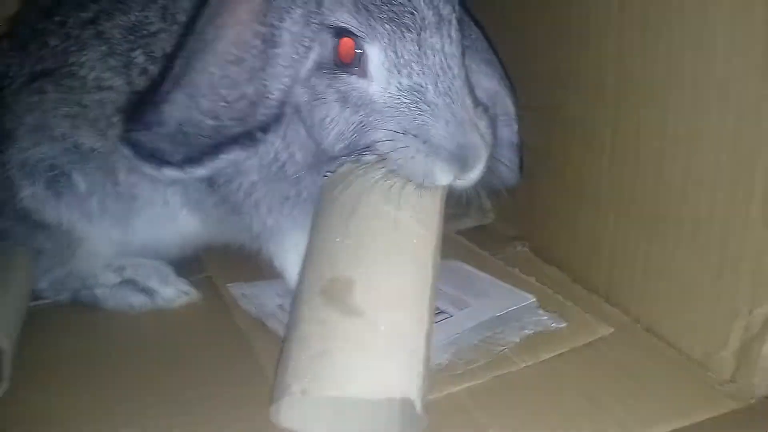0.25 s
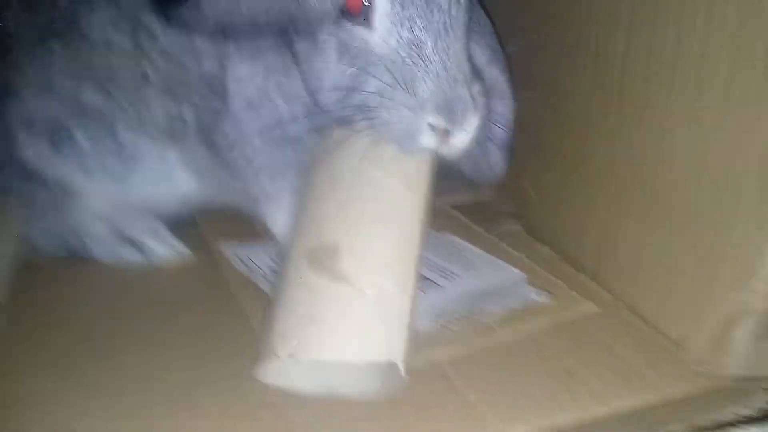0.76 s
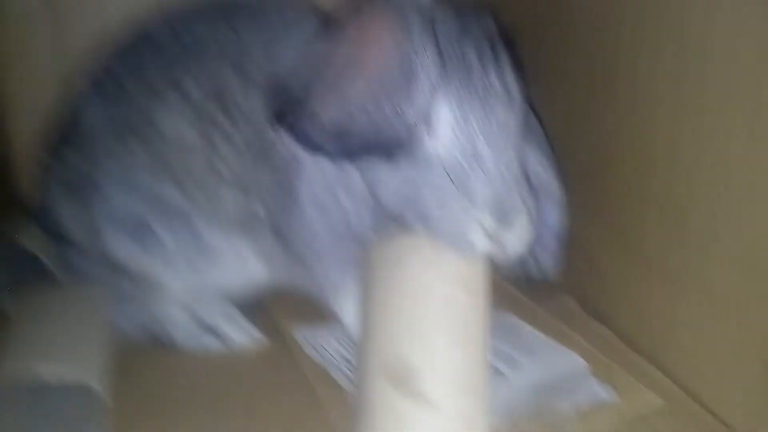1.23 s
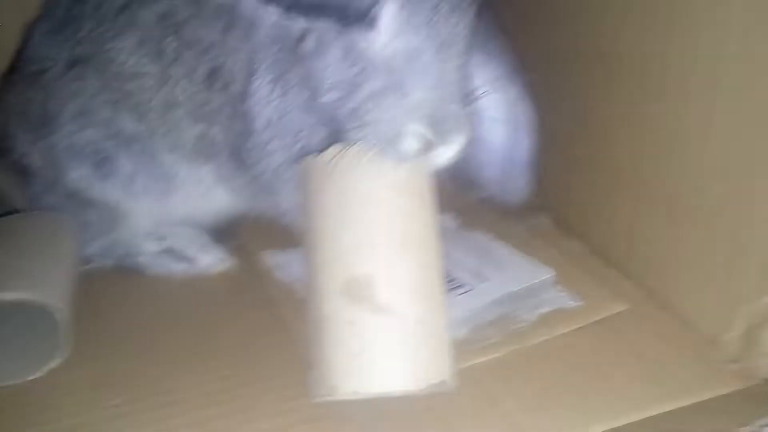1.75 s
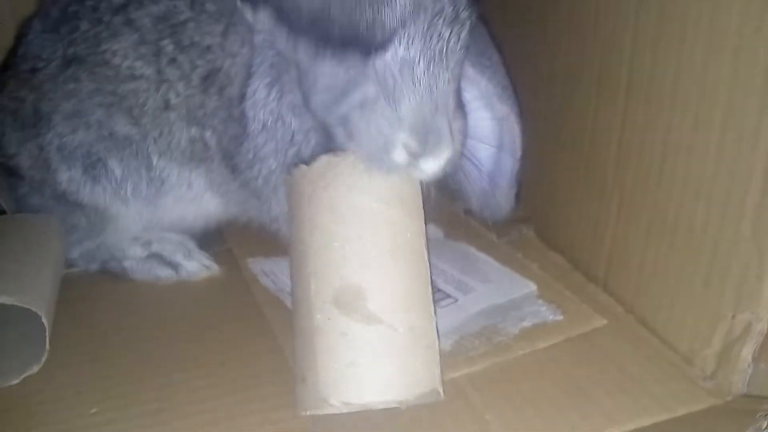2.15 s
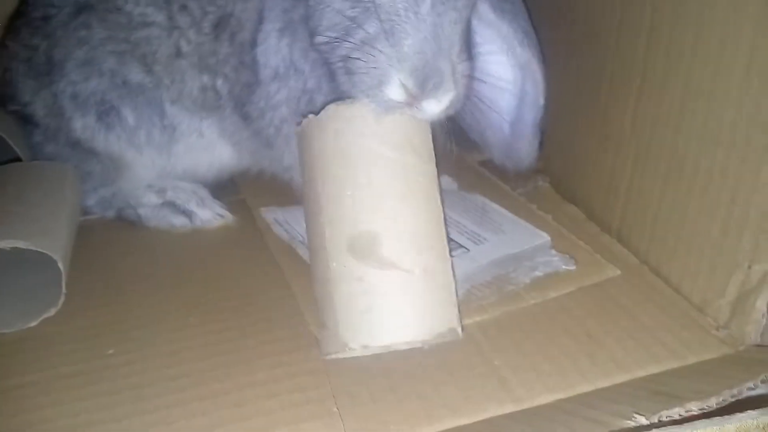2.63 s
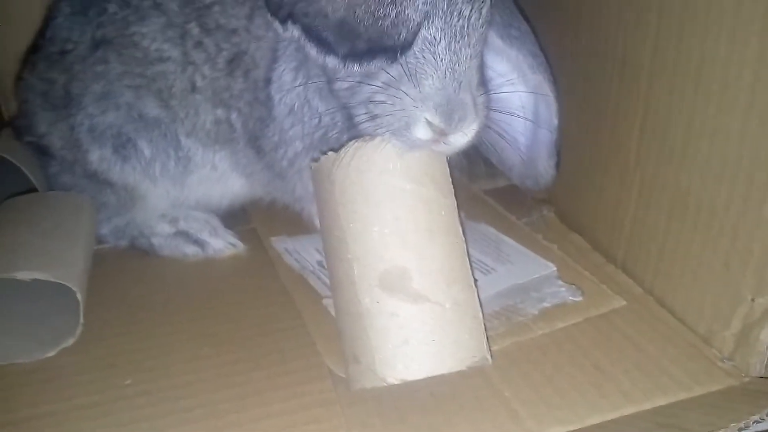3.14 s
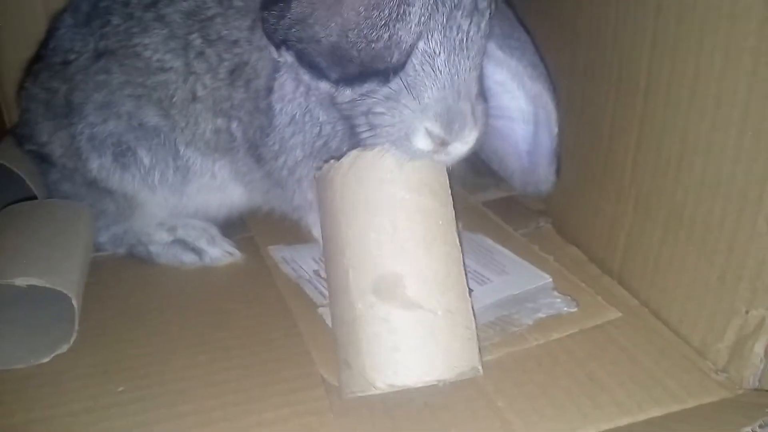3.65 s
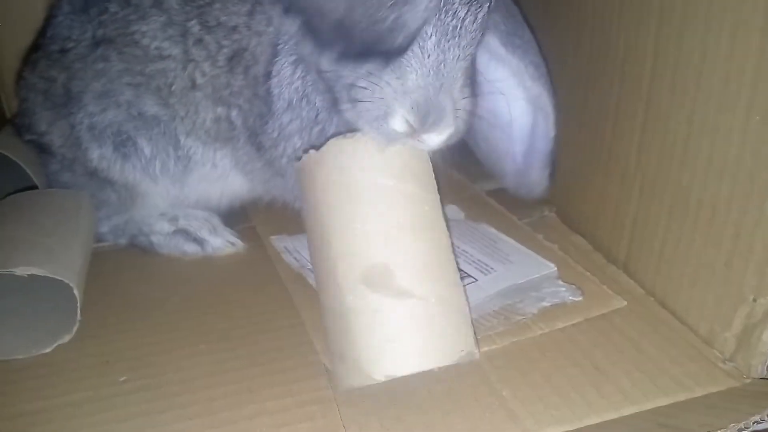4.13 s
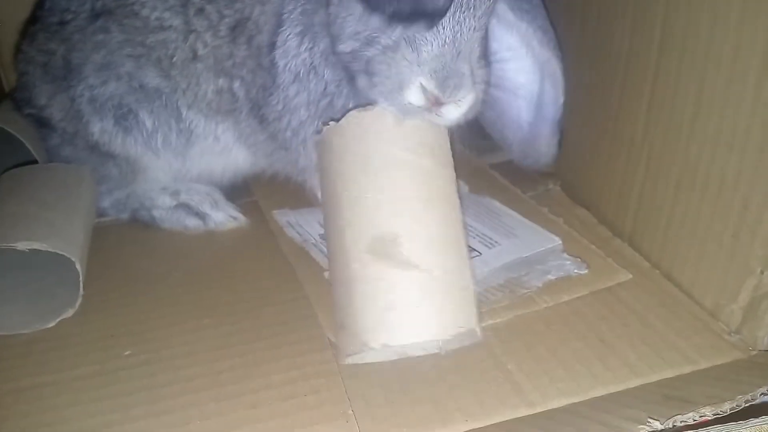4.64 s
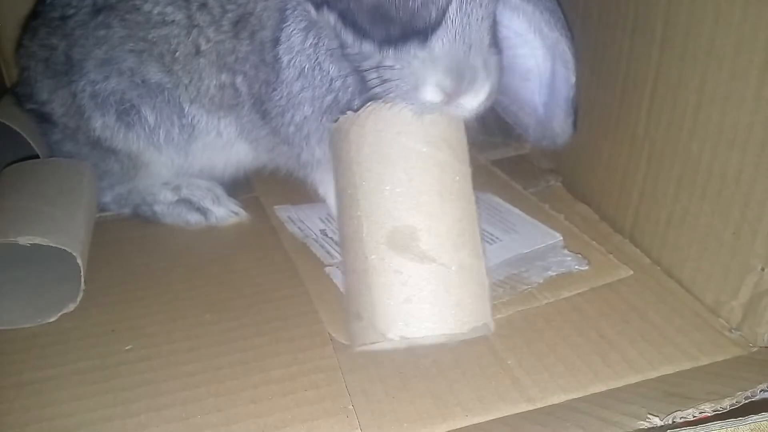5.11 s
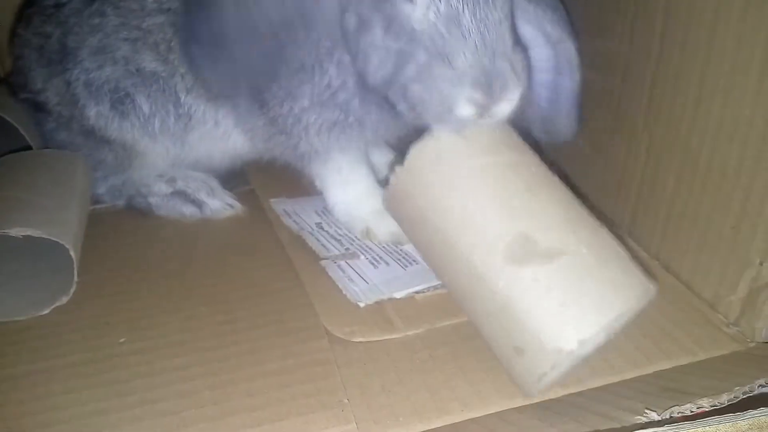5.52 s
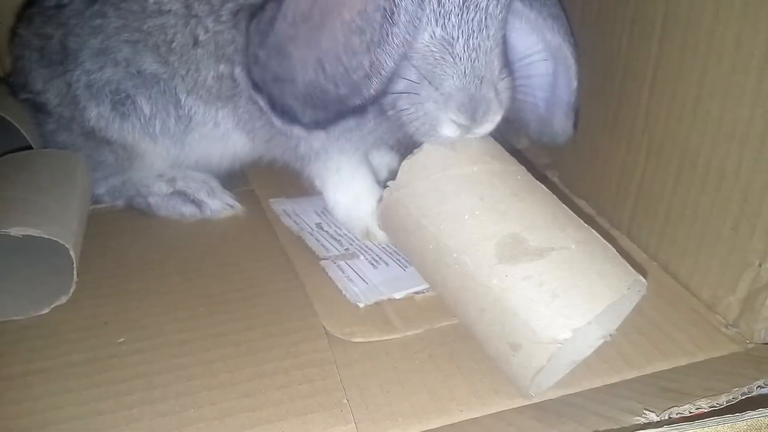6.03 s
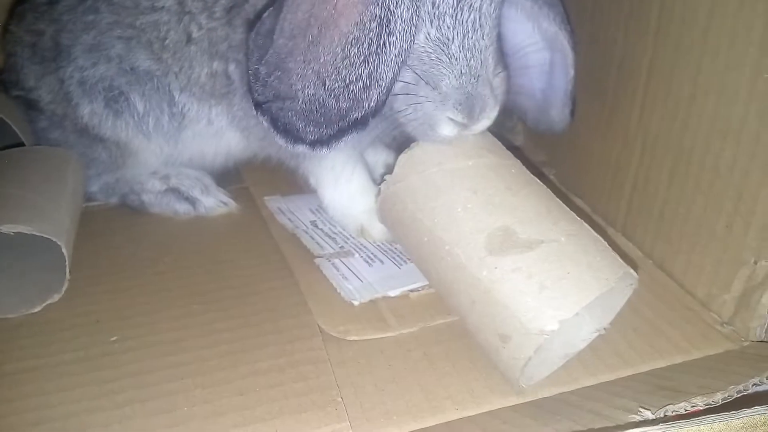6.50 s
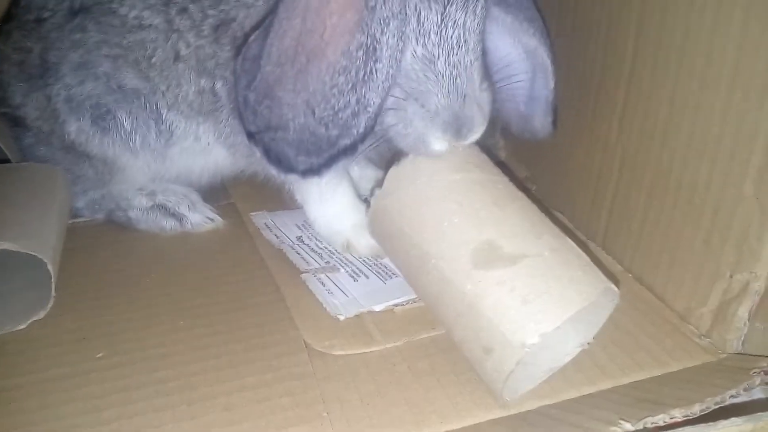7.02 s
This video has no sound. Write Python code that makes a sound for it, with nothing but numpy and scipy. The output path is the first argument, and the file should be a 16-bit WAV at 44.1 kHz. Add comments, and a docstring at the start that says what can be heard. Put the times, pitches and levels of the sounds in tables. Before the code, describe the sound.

A rabbit gnaws a cardboard tube very close to a small microphone, in a box indoors, over a quiet steady hiss and a barely audible low hum that stops near 2.9 s. From the start, crisp hollow bites come several per second, uneven in strength, with hissing paper tears between them until about 1.6 s. A strong crunch lands at 1.3 s; the heaviest cluster runs from 1.8 to 2.5 s, with dry crackles, pops, a soft thud and scraping. Biting then nearly stops. At 3.3-3.6 s rough scrapes lead to a sharp click and small bumps. Faint nibbles with tiny ringing ticks follow from 3.9 to 4.8 s, while a dull traffic-like rush swells, peaking near 5 s, then fading. A short scrape at 5.6 s and a stronger double scrape around 6.1-6.2 s give way to light papery rustling until the end at about 7.3 s.

```python
"""A rabbit gnaws a cardboard tube inside a cardboard box, close to a small microphone.
Each bite is a burst of breaking fibres (noise) that rings the tube; tearing paper hisses between early bites.
Clicks and soft bumps join in, and scrapes and rustles, bands of grainy noise, grow stronger later on.
Behind it lie a steady hiss, a faint hum that stops, and a dull rush, like traffic, that swells and fades."""
import sys
import numpy as np
from scipy import signal
from scipy.fft import rfft, irfft, next_fast_len
from scipy.io import wavfile
from scipy.ndimage import map_coordinates

SR = 44100
rng = np.random.default_rng(int(sys.argv[2]) if len(sys.argv) > 2 else 0)


def int16_out(signal):
    """Quantize to a 16-bit WAV file."""
    q = np.round(np.clip(np.atleast_2d(signal).T, -1, 1) * 32767)
    wavfile.write(sys.argv[1], SR, q.astype(np.int16))


N = 320562
TOP_HZ = 15950  # nothing in the final sound lies above this


def amp(db):
    """Turn decibels into a gain."""
    return 10 ** (np.asarray(db) / 20)


def unit(x):
    """Scale a sound to an average (rms) level of 1."""
    return x / np.sqrt(np.mean(x ** 2) + 1e-20)


def along(points, hz):
    """Read a curve of (Hz, value) points, with frequency on a log axis."""
    f, values = np.transpose(points)
    return np.interp(np.log(hz + 1), np.log(f + 1), values)


def curves(rows):
    """Draw straight lines between timed rows: one curve for each column after the time."""
    s, *columns = np.transpose(rows)
    return [np.interp(np.arange(N) / SR, s, column) for column in columns]


def filtered(x, response):
    """Multiply each frequency of a sound by a response, given as a function of Hz."""
    size = next_fast_len(len(x) + 4096)
    spectrum = rfft(x, size) * response(np.fft.rfftfreq(size, 1 / SR))
    return irfft(spectrum, size)[:len(x)]


def ring(x, modes):
    """Send a sound through damped resonances, given as (Hz, width in Hz, dB)."""
    def response(f):
        total = 0
        for k, (centre, width, db) in enumerate(modes):
            damping = 1j * f * width
            # neighbours have opposite signs
            total = total + (-1) ** k * amp(db) * damping / (centre * centre - f * f + damping)
        return total
    return filtered(x, response)


def grains(size, spread_db):
    """Tiny fibre slips of very unequal size; no spread gives smooth noise."""
    sizes_db = spread_db * np.clip(rng.standard_normal(size), -3, 3)
    return rng.standard_normal(size) * amp(sizes_db)


def noise(colour, spread_db=0):
    """Noise of rms 1, coloured by a curve of (Hz, dB) points."""
    return unit(filtered(grains(N, spread_db), lambda f: amp(along(colour, f))))


def patchy(x, width_hz, length, depth_db):
    """Random patches of pitch and time grow louder or softer; width in Hz, length in s, result at rms 1."""
    frame = 1024
    z = signal.stft(x, nperseg=frame)[2]
    patch_steps = np.array([SR / frame / width_hz, frame / 2 / SR / length])
    rows, cols = np.indices(z.shape) * patch_steps[:, None, None]
    knots = rng.standard_normal(z.shape)
    field = map_coordinates(knots, [rows, cols], order=1, mode="wrap")
    return unit(signal.istft(z * amp(depth_db * field), nperseg=frame)[1][:len(x)])


def add(track, s, sound):
    """Mix a sound into the track from time s."""
    i = round(s * SR)
    part = sound[max(-i, 0):max(N - i, 0)]
    track[max(i, 0):max(i, 0) + len(part)] += part


def bites():
    """Sharp bites that break through, and soft chews that mostly crush the card."""
    # Each row: time in seconds, level of the upper wall in dB, hollowness (lower wall over upper) in dB,
    # brightness (fibres over upper wall) in dB.
    bite_rows = [(0.09, -37, 2.5, 1), (0.2115, -45.5, -6, 6), (0.3281, -35, -1.5, 2.5),
                 (0.4341, -31.5, -6, -2.5), (0.5403, -39.5, -7, 6.5), (0.8696, -34, 6.5, 6.5),
                 (1.016, -34, -10, 5.5), (1.1531, -34, 0, 3.5), (1.3347, -25, -0.5, 7.5),
                 (1.6259, -38.5, -14, 2.5), (1.824, -41.5, 3, -1), (1.973, -28.5, 2.5, 3.5),
                 (2.0848, -24.5, -18.5, -4), (2.2662, -29.5, 0, -4), (2.467, -22, -9, -3.5),
                 (2.9353, -46.5, -15, 2), (3.8587, -48.5, -9, -1), (4.0731, -45, -4, -0.5),
                 (4.2932, -38.5, -9.5, -5), (4.4032, -36.5, -31, -5), (4.521, -38.5, -10, -9),
                 (4.836, -38.5, -5, -3), (6.7465, -56.5, -10, 1.5)]
    # Each row: time in seconds, level of the upper wall in dB.
    chew_rows = [(0.6952, -39.5), (1.0103, -42), (1.461, -36.5), (1.594, -50.5), (1.9504, -43.5),
                 (4.709, -47.5)]
    out = np.zeros(N)
    for s, db, hollow_db, bright_db in bite_rows:
        # the teeth press equally hard at any break, but the crush stays at least 10 dB under a faint one
        crush_db = min(-52.5 - db, -10)
        add(out, *gnaw(s, db, hollow_db, bright_db, crush_db))
    for s, db in chew_rows:
        add(out, *gnaw(s, db, hollow_db=-15.5, bright_db=-1.5, crush_db=9))
    return out


def gnaw(s, level_db, hollow_db, bright_db, crush_db):
    """Teeth crush the card, then a burst of fibre breaks rings the tube. Returns start time and sound."""
    # The tube's resonances in five groups: air column, lower wall, upper wall, rim, fibres.
    # Each row: pitch in Hz before the grip shifts it, width in Hz, typical level within its group in dB.
    tube_groups = [
        [(398, 133, 17), (676, 63, -10)],
        [(1061, 99, 0)],
        [(1248, 44, 10.5), (1487, 114, 24.5), (1855, 580, 1)],
        [(2540, 420, -6), (3076, 88, 7), (3885, 380, 1.5)],
        [(4860, 363, 5), (6080, 550, 4), (7000, 760, 2), (11080, 390, -16)],
    ]
    t = np.arange(-SR // 25, SR // 20) / SR
    rise_s, fall_s, lead_s = 0.0005, 0.00084, 0.0071

    late = t - .0007
    burst = np.tanh(1.6 * np.exp(-np.abs(late) / np.where(late < 0, rise_s, fall_s)))
    crush = np.exp(-np.abs(t) / lead_s) * np.clip(1 + t / 0.049, 0, 1)
    breaking = burst * rng.standard_normal(len(t))
    crushing = amp(crush_db) * crush * unit(grains(len(t), spread_db=4.0))
    force = breaking + crushing

    lower_db, fibres_db = level_db + hollow_db, level_db + bright_db
    column_db = -28 + 0.41 * lower_db  # the air column partly follows the lower wall
    if s > 2.03:
        column_db -= 6.5  # from here the floor covers the tube's far end and muffles the column
    rim_db = level_db - 6 + 0.96 * bright_db
    levels = [column_db, lower_db, level_db, rim_db, fibres_db]

    grip = 1 + 0.027 * np.clip(rng.standard_normal(), -1, 1)  # the jaw's grip changes the wall's stiffness
    span = SR // 100  # levels are rms over ten milliseconds
    sound = np.zeros(len(t))
    for db, modes in zip(levels, tube_groups):
        hz, width, gain_db = np.transpose(modes)
        gain_db = gain_db + 2.0 * rng.standard_normal(len(hz))  # the teeth land at a new spot each time
        gain_db = gain_db - 6.5 * np.maximum(np.log2(hz / 5000), 0)  # soft card damps high modes, dB per octave
        rung = ring(force, np.column_stack([hz * grip, width, gain_db]))
        # each group answers only near its own range
        edges = [hz[0] * .8, min(hz[-1] * 1.3, SR * .45)]
        tone = signal.sosfilt(signal.butter(2, edges, "band", fs=SR, output="sos"), rung)
        sound += amp(db) * tone * np.sqrt(span / np.sum(tone ** 2))
    top_hz = min(9450 * 2 ** (bright_db / 18.5), TOP_HZ)  # a brighter break reaches higher
    return s + t[0], signal.sosfilt(signal.butter(2, top_hz, fs=SR, output="sos"), sound)


def tearing():
    """Plies peel apart: each tug catches quickly, slackens and dies away; hard tugs add a spiky fizz."""
    # Each row: start in seconds, length in seconds, level in dB.
    tug_rows = [(0, .08, -55), (0.214, 0.043, -57), (0.326, .08, -46.5), (0.429, 0.05, -42.5),
                (0.557, 0.069, -47.5), (0.852, 0.1, -45.5), (1.11, 0.049, -55.5), (1.385, 0.097, -40),
                (1.614, .05, -56.5)]
    # Colour of the peeling paper. Each row: frequency in Hz, level in dB.
    tear_colour = [(200, -17.5), (400, -25), (700, -29), (1080, -1.5), (1550, -10), (2100, -17.5),
                   (3200, -9), (4300, 0.5), (5500, 0), (6700, 2.5), (8200, -18), (10300, -22), (12500, -41),
                   (15800, -34)]
    attack_s, sag_db_per_s, release_db_per_s = 0.023, 25, 190
    t, pull = np.arange(N) / SR, np.zeros(N)
    for s, length, db in tug_rows:
        attack = np.exp(-(np.minimum(t - s, 0) / attack_s) ** 2)
        sag_db = sag_db_per_s * np.clip(t - s, 0, length)
        release_db = release_db_per_s * np.maximum(t - s - length, 0)
        pull = np.maximum(pull, attack * amp(db - sag_db - release_db))
    peel = patchy(noise(tear_colour, spread_db=8.0), width_hz=190, length=.16, depth_db=4.8)
    fizz = noise([(3000, -25), (7500, 0), (15800, -6)], spread_db=14)
    return pull * (peel + amp(-22) * fizz * np.sqrt(pull / pull.max()))


def snaps(rows, cycles, onset):
    """Clicks swell and ring, both timed in cycles of their pitch; so small a source radiates little bass."""
    out, t = np.zeros(N), np.arange(SR // 100) / SR
    for s, db, hz in rows:
        swell = 1 - np.exp(-t * hz / onset)
        click = np.sin(2 * np.pi * hz * t) * np.exp(-t * hz / cycles) * swell
        click = signal.sosfilt(signal.butter(2, hz / 2, "high", fs=SR, output="sos"), click)
        add(out, s, amp(db) * click / np.abs(click).max())
    return out


def crackles():
    """Single fibres snap with very short, dry clicks."""
    # Each row: start in seconds, peak in dB, pitch in Hz.
    crackle_rows = [(.581, -31, 6300), (.604, -33, 6300), (.676, -26.5, 6000), (1.858, -23.5, 5500),
                    (1.8643, -36, 5500), (1.8685, -27, 5500), (1.8751, -22, 5330)]
    return snaps(crackle_rows, cycles=0.27, onset=0.14)


def pops():
    """A crease in the wall pops through with a short, heavily damped click."""
    # Each row: start in seconds, peak in dB, pitch in Hz.
    pop_rows = [(1.896, -23.5, 2440), (1.999, -18, 2400), (2.0625, -25, 4500), (3.522, -20, 2250)]
    return snaps(pop_rows, cycles=0.77, onset=0.89)


def ticks():
    """The hard incisors tick and ring for many cycles."""
    # Each row: start in seconds, peak in dB, pitch in Hz.
    tick_rows = [(1.834, -28.5, 5240), (2.765, -30, 5930), (3.5223, -21, 4460), (4.295, -26.5, 4940),
                 (4.404, -31.5, 4930), (4.8368, -26.5, 4970)]
    return snaps(tick_rows, cycles=13.6, onset=1.9)


def bumps():
    """The box floor gives a short thud whose pitch sags as it relaxes."""
    # Each row: start in seconds, level before onset and decay in dB, middle of the pitch sag in Hz,
    # time to fall by 60 dB in seconds.
    bump_rows = [(1.8235, -25, 203, 0.028), (3.5205, -31, 210, 0.03), (3.578, -30, 487, 0.025),
                 (5.055, -34.5, 530, 0.049)]
    out, t = np.zeros(N), np.arange(SR // 8) / SR
    for s, db, hz, t60 in bump_rows:
        pitch = hz * (1 + 0.16 * (2 * np.exp(-t / 0.0036) - 1))  # from 16 % above to 16 % below
        envelope = amp(db - 60 * t / t60) * (1 - np.exp(-t / 0.00024))
        add(out, s, envelope * np.sin(2 * np.pi * np.cumsum(pitch) / SR))
    return out


def scrapes():
    """The tube and torn card scrape along the box in strokes, some broad and some narrow in pitch."""
    # Each row: peak time in seconds, rise in seconds, time to fall by 60 dB in seconds, level in dB,
    # low edge in Hz, high edge in Hz.
    scrape_rows = [(.64, 0.13, 0.36, -65.5, 7500, 15500), (1.466, .03, 0.098, -52, 6500, 15500),
                   (1.912, 0.025, 0.69, -46, 1900, 5900), (2.011, 0.035, 0.66, -37, 1680, 4120),
                   (3.294, 0.03, 0.76, -40.5, 1580, 7050), (3.427, 0.031, 0.36, -37.5, 1330, 5970),
                   (3.532, 0.0055, 0.27, -29.5, 1820, 5000), (3.62, 0.1, 0.8, -44, 2120, 2400),
                   (5.13, 0.12, 1.78, -49, 484, 775), (5.584, .014, 0.12, -37.5, 1280, 8900),
                   (6.113, 0.015, 0.52, -37, 4070, 7600), (6.213, 0.06, 0.41, -29, 1050, 7200),
                   (6.203, 0.016, 0.27, -42, 5000, 15500)]
    out = np.zeros(N)
    for row in scrape_rows:
        add(out, *stroke(*row))
    return out


def rustles():
    """Papery scrapes and rustles, faint to strong, in narrow bands that all share one shape."""
    # Each row: peak time in seconds, time to fall by 60 dB in seconds, level in dB, centre in Hz.
    rustle_rows = [(.01, 1, -55.5, 3800), (1.018, 0.11, -46, 2500), (1.17, 0.39, -48.5, 2460),
                   (2.323, 0.2, -52, 1250), (2.488, 0.29, -45, 5700), (2.722, 0.16, -59, 5200),
                   (2.763, 0.066, -42, 3900), (3.161, .6, -59, 6300), (3.275, 0.28, -62.5, 9400),
                   (3.541, 0.49, -38, 4500), (3.53, 0.16, -66, 9400), (3.89, 0.084, -52.5, 5900),
                   (4.09, 0.43, -54.5, 5270), (4.31, .18, -48, 4640), (4.425, 0.46, -56, 5300),
                   (4.525, 0.4, -51, 4900), (4.86, 0.72, -49, 4030), (5.28, 0.55, -53, 526),
                   (5.584, 0.046, -51, 12500), (5.672, .18, -49.5, 6000), (5.96, .9, -58, 3860),
                   (6.235, 0.44, -40.5, 3200), (6.473, .3, -53.5, 6130), (6.653, .18, -53, 5770),
                   (6.808, 0.45, -71, 10900), (6.959, 1, -55, 4720), (7.04, 0.23, -54, 1600),
                   (7.15, 0.36, -53, 5360), (7.205, 0.22, -46.5, 4150), (7.25, 0.55, -50, 3530)]
    out, half_band = np.zeros(N), 2 ** (0.53 / 2)  # the band is 0.53 octaves wide
    for s, t60, db, hz in rustle_rows:
        rise = .055 * t60  # a longer sound also starts more slowly
        add(out, *stroke(s, rise, t60, db, hz / half_band, hz * half_band))
    return out


def stroke(s, rise, t60, db, low_hz, high_hz):
    """A swell of dense slips; the contact sets its band and resonances. Returns start time and sound."""
    # Colour of rubbed paper. Each row: frequency in Hz, level in dB.
    paper_colour = [(200, 3), (800, -3), (1300, -0.5), (2000, -5), (2500, -6), (3000, -5.5), (4600, -5),
                    (5500, -1.5), (6900, -7.5), (8000, -12), (11000, -3.5), (15800, -21)]
    t = np.arange(-SR // 5, SR * 3 // 5) / SR

    def response(f):
        band = 1 / np.sqrt((1 + (low_hz / (f + 1)) ** 12) * (1 + (f / high_hz) ** 18))
        # a weak, wide skirt spreads beyond the band
        skirt = amp(-22) * np.sqrt(abs(high_hz - low_hz) / 4000) / (1 + (f / 6000) ** 2) * f / (f + 200)
        return (band + skirt) * amp(along(paper_colour, f))

    slips = filtered(grains(len(t), spread_db=5.5), response)
    slips = patchy(slips, width_hz=150, length=.18, depth_db=5.2)
    swell = np.where(t < 0, np.exp(-(t / rise) ** 2), amp(-60 * np.abs(t) / t60))
    return s + t[0], amp(db) * swell * slips


def room(x):
    """A diffuse tail of fading noise, drawn afresh every third of a second."""
    # Each row: frequency in Hz, time for the tail to fall by 60 dB in seconds.
    room_decay = [(200, 0.32), (1200, 0.19), (5000, 0.18), (8000, 0.11), (14000, 0.098)]
    out, step = np.zeros(N), SR // 3
    for i in range(0, N, step):
        hz, t, z = signal.stft(rng.standard_normal(SR // 2), SR, nperseg=256)
        fade = amp(-60 * t / along(room_decay, hz)[:, None])
        tail = signal.istft(z * fade, SR, nperseg=256)[1]
        echo = signal.fftconvolve(x[i:i + step], tail / np.linalg.norm(tail))
        add(out, i / SR + .003, echo)
    return out


def far_rush():
    """A dull rush, like traffic outside, swells and leaves a rumble with a deep drone inside it."""
    # Each row: time in seconds, level of the rush in dB, level of its rumble in dB.
    rush_rows = [(3.1, -67, -87), (3.3, -57, -70), (4.3, -54, -68), (4.75, -47.5, -56), (5.15, -46.5, -58),
                 (5.45, -52.5, -57), (5.7, -58.5, -62.5), (6.3, -63.5, -61), (7.27, -67.5, -65.5)]
    # Colour of the rush. Each row: frequency in Hz, level in dB.
    rush_colour = [(330, -15.5), (450, -1.5), (525, -10.5), (590, -4.5), (740, -3.5), (830, 6), (1050, -2),
                   (1220, -4), (1550, -2), (2300, -15.5), (3800, -12), (8000, -40)]
    # Colour of the rumble. Each row: frequency in Hz, level in dB.
    rumble_colour = [(30, -28), (65, -18.5), (110, -45), (150, -5), (180, -15), (225, -5), (300, -19),
                     (500, -26), (1000, -62)]
    rush_db, rumble_db = curves(rush_rows)
    arrival = np.interp(np.arange(N) / SR, [2.9, 3.4], [0, 1])  # silent before, then fades in
    rush = amp(rush_db) * patchy(noise(rush_colour), width_hz=38, length=.2, depth_db=7.5)
    rumble = patchy(noise(rumble_colour), width_hz=45, length=.15, depth_db=4.4)
    drone = amp(-12) * hum(70.3, drift_hz=3.8)
    return arrival * (rush + amp(rumble_db) * (rumble + drone))


def steady_hiss():
    """Quiet coloured noise that stays at one level, with small patches in its colour."""
    # Each row: frequency in Hz, level in dB.
    air_colour = [(25, -12), (60, -13), (140, -5.5), (250, -3), (600, -8), (830, -7), (1400, -8),
                  (2500, -10), (3700, -7.5), (4400, -9), (6200, -7.5), (8000, -22), (11000, -28.5),
                  (15800, -35.5)]
    return amp(-59.5) * patchy(noise(air_colour), width_hz=100, length=0.058, depth_db=1.0)


def faint_hum():
    """A faint, low tone that fades out over the last 0.05 s before it stops."""
    stop_s = 2.9
    running = np.clip((stop_s - np.arange(N) / SR) / .05, 0, 1)
    return running * amp(-78.5) * hum(92, drift_hz=0.36)


def hum(hz, drift_hz):
    """A tone of rms 1 whose pitch wanders a little."""
    wander = np.interp(np.arange(N), np.linspace(0, N, 60), rng.standard_normal(60))
    return np.sqrt(2) * np.sin(2 * np.pi * np.cumsum(hz + drift_hz * wander) / SR)


def scene():
    """Bites, clicks and bumps with their room, over the rubbing sounds and the background."""
    hits = bites() + crackles() + pops() + ticks() + bumps()
    rubbing = tearing() + scrapes() + rustles()
    background = far_rush() + steady_hiss() + faint_hum()
    return (hits + amp(-11.0) * room(hits) + rubbing + background)[None]


def record(dry):
    """The small microphone thins the deepest bass, and nothing passes above the band limit."""
    low_cut_hz = 45

    def response(f):
        bass_cut = f ** 2 / np.sqrt(f ** 4 + low_cut_hz ** 4)
        return (f < TOP_HZ) * bass_cut

    return filtered(dry[0], response)[None]


dry = scene()
out = record(dry)
int16_out(out)
```